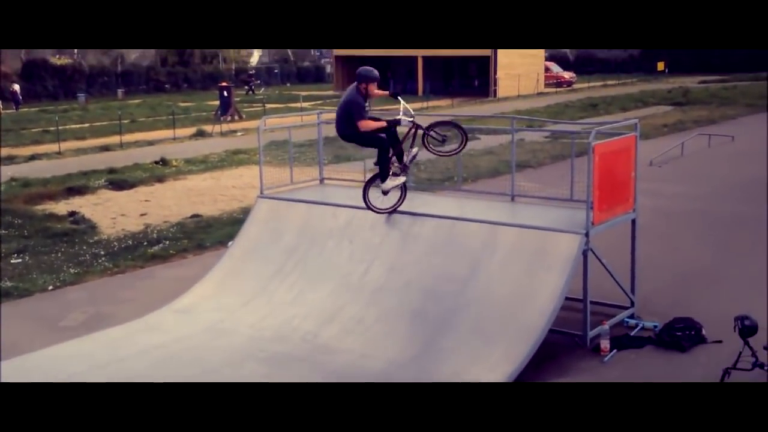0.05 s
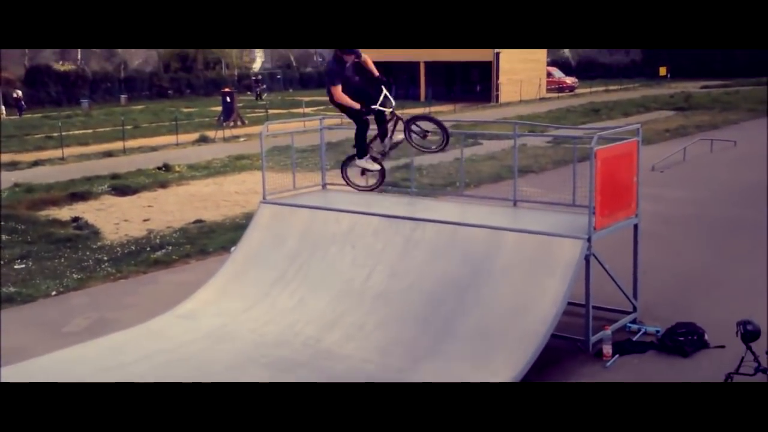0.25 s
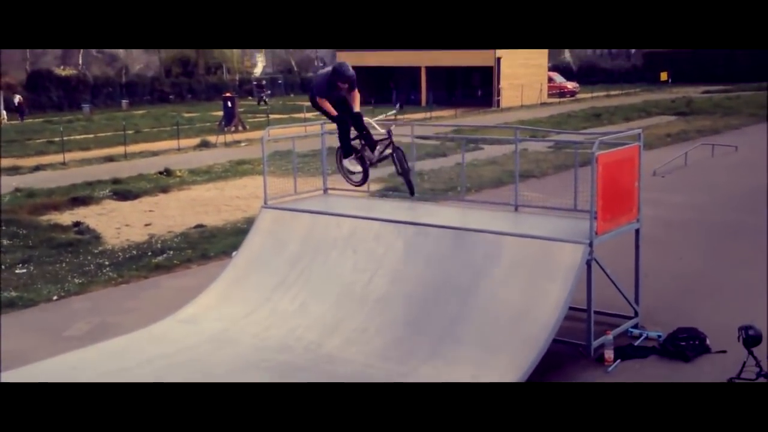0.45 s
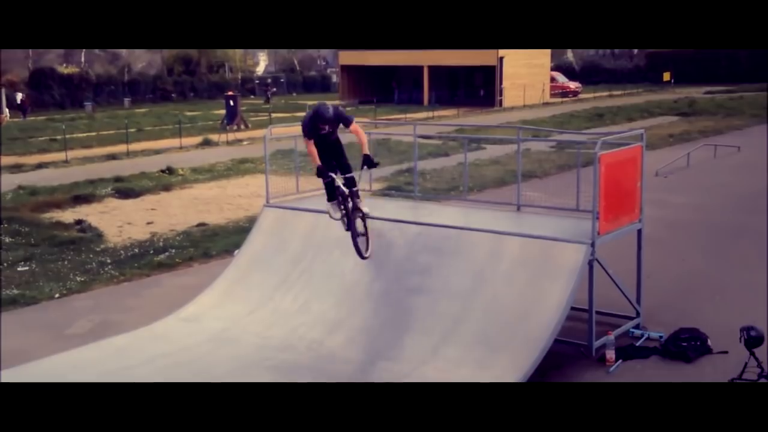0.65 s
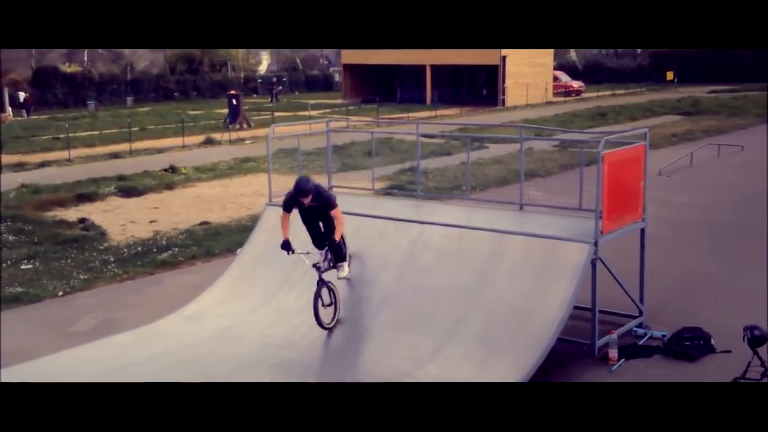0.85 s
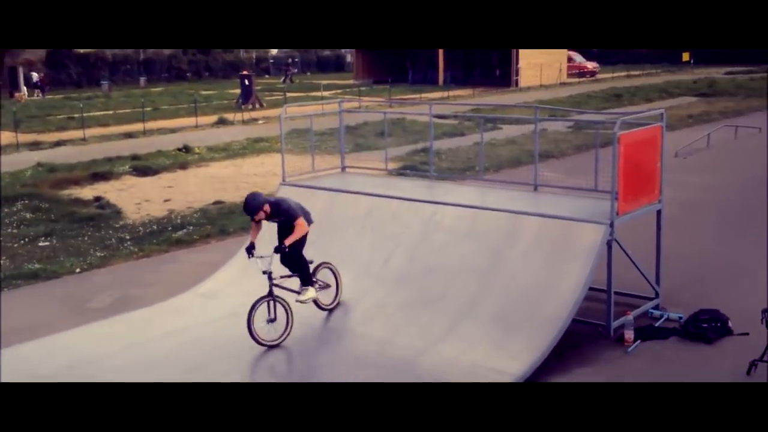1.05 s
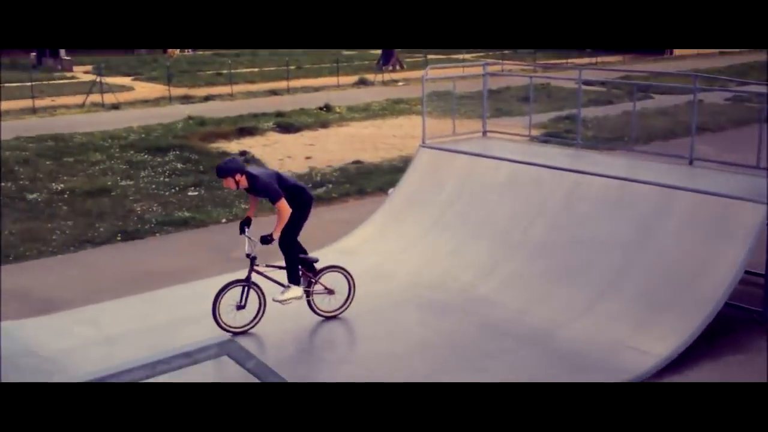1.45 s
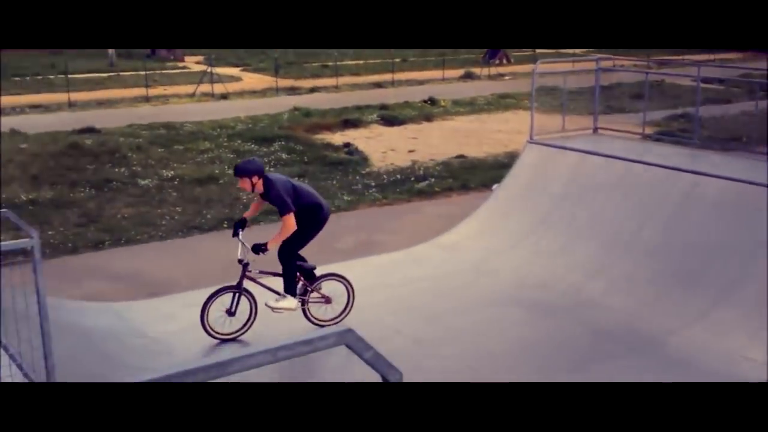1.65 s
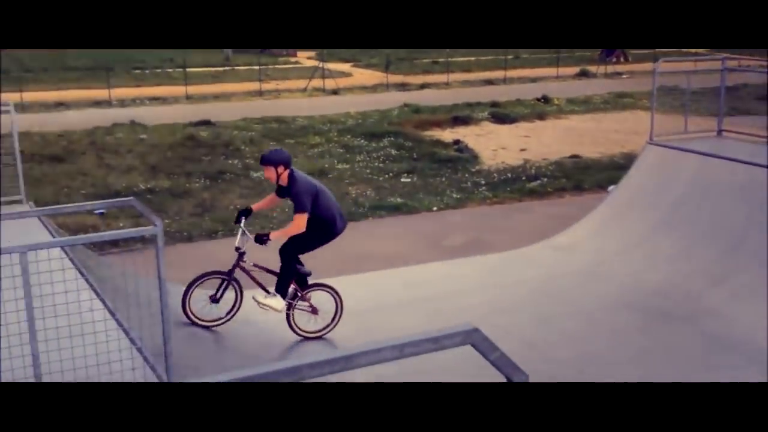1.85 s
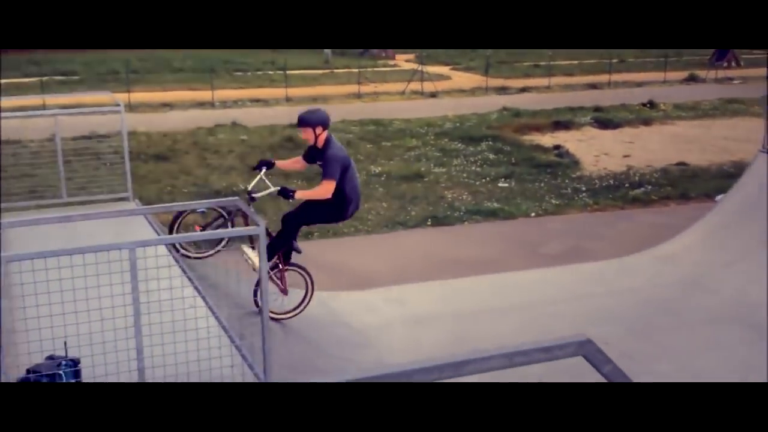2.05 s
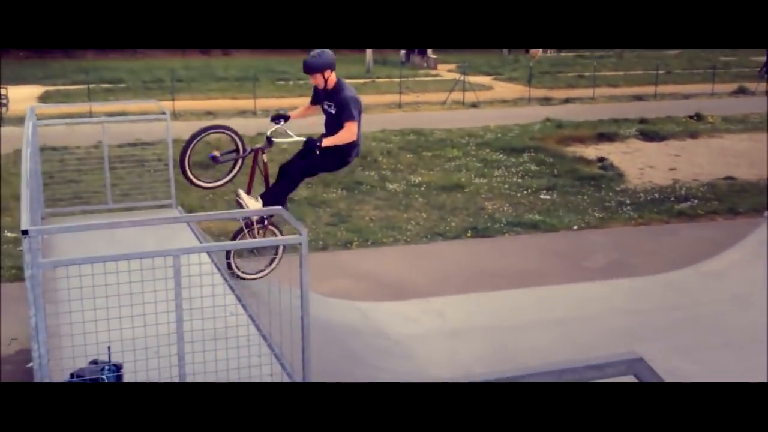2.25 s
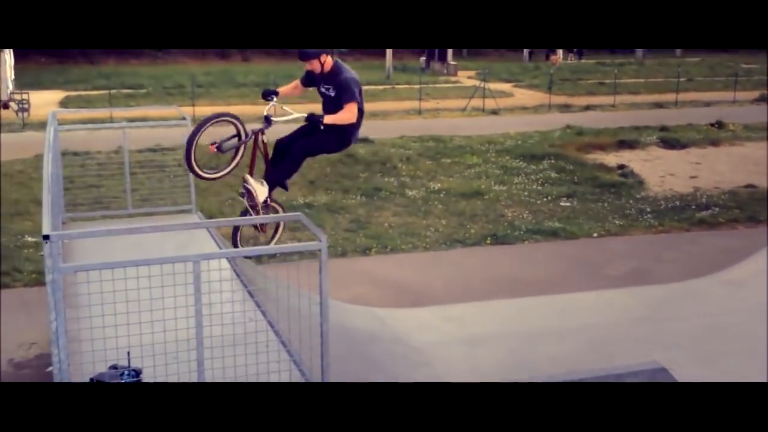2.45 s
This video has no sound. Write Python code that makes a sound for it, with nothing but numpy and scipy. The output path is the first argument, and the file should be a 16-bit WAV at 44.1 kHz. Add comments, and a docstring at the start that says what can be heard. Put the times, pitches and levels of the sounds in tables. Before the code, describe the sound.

A BMX bike thumps on a hollow ramp, then coasts with its freewheel ticking.

```python
"""A hollow quarter pipe booms as a BMX bike hops on its deck, drops in and coasts across a skatepark.
The wheels load the panels and set them ringing, the frame clatters and a tyre squeaks as it twists.
The freewheel pawl ticks with the wheel's speed over grainy tyre hiss and a rising hum, and a wheel
thumps over the ramp's foot. Behind it all: a bed of open air and a few far birds."""
import sys
import numpy as np
from scipy import signal
from scipy.fft import rfft, irfft
from scipy.io import wavfile

SR = 44100
rng = np.random.default_rng(int(sys.argv[2]) if len(sys.argv) > 2 else 0)


def bounce(signal):
    """Save signal as a 16-bit WAV file at the path given by the first command-line argument."""
    frames = np.transpose(np.atleast_2d(signal))
    limited = np.clip(frames, -1, 1)
    pcm = np.round(limited * 32767).astype(np.int16)
    wavfile.write(sys.argv[1], SR, pcm)


N = 110250

# wheels loading the ramp: t/s, level/dB, contact/s
WHEEL_BLOWS = [(.052, -41, .007), (.155, -39, .012), (.235, -17.5, .008), (.254, -19, .006),
               (.287, -19, .009), (.384, -20.5, .008), (.453, -22, .008), (.517, -22.5, .009),
               (.599, -30, .008), (.75, -29, .012), (.886, -36.5, .007), (1.02, -28.5, .016),
               (1.583, -32, .009), (2.035, -42, .012)]
# modes of the hollow ramp's panels: f/Hz, level/dB, t60/s
PANEL_MODES = [(67, 5, .3), (104, 1.5, .22), (122, -1.5, .17), (164, -6, .2), (208, -4, .14),
               (240, -3, .15), (335, -4.5, .11), (405, -14, .14)]
# ramp rumble under the rolling tyres: t/s, level/dB
RUMBLE_FADER = [(0, -41), (.1, -49), (.21, -48.5), (.26, -43), (.42, -31.5), (.56, -34), (.68, -38.5),
                (.95, -45.5), (1.06, -43.5), (1.3, -40), (1.52, -42.5), (1.6, -38), (1.72, -49.5),
                (2.1, -44.5), (2.25, -60), (2.5, -50)]
# wheels crossing the lip at the ramp's foot: t/s, level/dB
LIP_HITS = [(1.197, -44), (1.3627, -25), (1.576, -48.5)]
# modes of the foot plate: f/Hz, level/dB, t60/s
PLATE_MODES = [(253, 3.5, 0.1), (318, -11.5, 0.068), (373, -5.5, 0.087), (429, -6, 0.088)]

# knocks of frame, chain and rims: t/s, level/dB, attack/s, decay/s, tilt/(dB per octave), high cut/Hz
FRAME_KNOCKS = [(.050, -49.5, 0.01, 0.02, 1.5, 10000), (0.065, -40, 0.0028, .013, 1.5, 10000),
                (0.08, -48.5, 0.012, 0.075, 1, 6500), (0.189, -42.5, 0.0041, 0.0054, 1, 8000),
                (0.228, -54, 0.0015, .012, 4, 8000), (.235, -28, 0.0024, 0.0071, -0.17, 5500),
                (0.251, -41, .003, 0.015, 1, 9000), (0.26, -28, 0.0023, 0.015, -2, 10000),
                (.108, -51, 0.003, 0.011, 1.5, 5460), (0.308, -40, 0.0037, 0.014, 0, 9000),
                (0.3507, -28, 0.0026, 0.011, -1, 9000), (.368, -30.5, 0.0021, 0.033, -4.5, 6000),
                (.662, -50, 0.0028, .03, 3, 11000), (0.86, -52, 0.0065, 0.047, 0.5, 10000),
                (1.356, -32.5, 0.0023, 0.0068, 6.5, 2300), (1.992, -50, 0.0066, 0.013, .5, 9000),
                (2.332, -55, 0.0041, 0.036, 13, 2500)]
# noise colour of the knocks: f/Hz, level/dB
KNOCK_EQ = [(150, 18.5), (330, 5.5), (540, -2.5), (780, 3), (1400, -5), (2100, -4.5), (2550, -7.5),
            (3200, -7.5), (4000, -8.5), (5600, -16.5), (8500, -15.5)]
# modes of rims and spokes: f/Hz, level/dB, t60/s
RIM_MODES = [(780, -6, 0.21), (1725, 1, .1), (2786, 2, 0.092), (3090, 7, 0.14), (3240, 9.5, 0.078),
             (3220, -9, 0.11), (3480, -20, 0.14)]

# speed of the freewheel's ticking: t/s, rate/Hz
TICK_RATE = [(0.373, 61.7), (0.428, 57.8), (0.474, 102.2), (0.548, 94.9), (0.605, 68.9), (0.744, 66.4),
             (0.832, 49.0), (0.89, 87.5), (0.998, 68.6), (1.109, 92.0), (1.25, 97.1), (1.286, 82.3),
             (1.357, 104.0), (1.523, 96.3), (1.598, 84.5), (1.651, 40.8), (1.761, 17.8), (1.9, 0.5)]
# tick strength as the bike nears and turns away: t/s, level/dB
TICK_FADER = [(.39, -57), (.44, -58), (.62, -59.5), (.82, -54.5), (1.0, -59), (1.15, -54.5), (1.34, -52),
              (1.46, -58.5), (1.61, -58), (1.67, -63.5), (1.74, -58.5), (1.9, -63)]
# noise colour of the ticks: f/Hz, level/dB
TICK_EQ = [(1500, -18), (3300, -3.5), (4300, -3), (5400, -7), (6800, -2.5), (8600, 0), (10000, 3)]
# modes of the hub: f/Hz, level/dB, t60/s
HUB_MODES = [(4080, -12.5, 0.068), (4860, -17.5, 0.13), (6350, -7, 0.016), (7160, -8, 0.043),
             (8640, -8, 0.046)]

# tyre hiss on the riding surface: t/s, level/dB
HISS_FADER = [(0, -54), (.22, -66.5), (.3, -52.5), (.6, -54.5), (.7, -52), (1.0, -56), (1.35, -54.5),
              (1.6, -55.5), (1.75, -60.5), (1.95, -61), (2.02, -58), (2.15, -63), (2.3, -59.5), (2.4, -58),
              (2.5, -58.5)]
# noise colour of the hiss: f/Hz, level/dB
HISS_EQ = [(200, 11), (350, 8.5), (520, -2), (850, 3), (1400, -2), (2100, 1.5), (3300, -9), (4300, -12.5),
           (5600, -17.5), (8500, -16.5)]
# rubber twisting on the deck: t/s, length/s, first f/Hz, last f/Hz, level/dB, peak/fraction of length
RUBBER_SQUEAKS = [(0.305, .064, 3480, 4650, -50, 0.65), (0.377, 0.026, 5300, 3660, -43.5, 0.1)]
# low hum, rising as the bike gathers speed: t/s, f/Hz, level/dB
HUM_GLIDE = [(0.419, 160, -58), (0.499, 171.8, -45), (0.581, 186, -34), (0.632, 211.2, -46.5),
             (.72, 215.5, -59), (1.122, 225, -75), (1.21, 235.7, -44), (1.331, 252.3, -57),
             (1.441, 271.7, -45.5), (1.542, 308.4, -51), (1.702, 331, -70.5)]

# reflections from ground and ramps: delay/s, level/dB
SLAPBACKS = [(0.0155, -12.5), (0.0267, -19.5)]
# far bird whistles: t/s, first f/Hz, last f/Hz, level/dB, attack/s, decay/s
BIRD_CALLS = [(2.112, 4560, 4100, -59, .04, .055), (2.222, 7800, 6650, -72, .025, .014),
              (2.385, 3250, 2980, -66, .025, .022)]
# noise colour of distant town and light air: f/Hz, level/dB
AIR_EQ = [(24, -35.5), (38, 11), (54, 9.5), (75, 4), (110, -11), (160, -3.5), (260, -24), (450, -17.5),
          (750, -18.5), (1300, -16.5), (2000, -22.5), (3000, -35.5), (4200, -57), (5700, -40.5),
          (8500, -62)]

HIGH_CUT_HZ = 9000


def ramp(dull_hz=260, low_cut_hz=40):
    """The hollow panels boom under each wheel blow and rumble while the tyres roll."""
    blows = sum(from_db(db) * tyre_push(start, contact) for start, db, contact in WHEEL_BLOWS)
    rumble = from_db(curve(RUMBLE_FADER)) * rms_one(ring(slow_noise(dull_hz), PANEL_MODES))
    low_cut = signal.butter(2, low_cut_hz, "high", fs=SR, output="sos")
    return signal.sosfilt(low_cut, ring(blows, PANEL_MODES) + rumble)


def foot_plate(contact_s=.0029):
    """Wheels strike the plate where the ramp meets the ground: short, hollow thumps."""
    force = sum(from_db(db) * tyre_push(start, contact_s) for start, db in LIP_HITS)
    return ring(force, PLATE_MODES)


def frame_clatter(rims_db=-22):
    """Each jolt rattles the bike's many damped parts; the rims ring on under the rattle."""
    knocks = 0
    for start, db, attack, decay, tilt, top_hz in FRAME_KNOCKS:
        high_cut = signal.butter(4, top_hz, fs=SR, output="sos")
        rattle = signal.sosfilt(high_cut, noise(KNOCK_EQ, tilt))
        knocks = knocks + from_db(db) * burst(seconds() - start, attack, decay) * rattle
    rims = np.std(knocks) * rms_one(ring(knocks, RIM_MODES))
    return knocks + from_db(rims_db) * rims


def freewheel(spread_db=2.0, lead_s=.0011):
    """The pawl snaps over each ratchet tooth with a bright tick, and the hub rings faintly."""
    t = seconds()
    coasting = (t > TICK_RATE[0][0]) * (t < TICK_RATE[-1][0])
    teeth_passed = np.cumsum(curve(TICK_RATE) * coasting) / SR
    tick_times = t[1:][np.diff(np.floor(teeth_passed)) > 0] - lead_s
    onsets = (tick_times * SR).astype(int)
    sizzle = noise(TICK_EQ)
    strength = from_db(curve(TICK_FADER) + spread_db * rng.standard_normal(N))
    snaps = np.zeros(N)
    snaps[onsets] = strength[onsets]
    tick_shape = burst(t[:SR // 20], attack_s=.0012, decay_s=.0022, hold_s=.0008)
    return sizzle * signal.fftconvolve(snaps, tick_shape)[:N] + ring(snaps, HUB_MODES)


def tyre_hiss(grain_db=.9, grain_hz=70):
    """Rubber rolls over the riding surface: a hiss with a fine grain in its level."""
    grain = grain_db * slow_noise(grain_hz)
    return from_db(curve(HISS_FADER) + grain) * noise(HISS_EQ)


def tyre_squeaks():
    """Rubber twists on the deck in short, gliding squeaks."""
    out = 0
    for start, length, first_hz, last_hz, db, peak in RUBBER_SQUEAKS:
        progress = (seconds() - start) / length
        swell = np.interp(progress, [0, peak, 1], [0, 1, 0])
        pitch = np.interp(progress, [0, 1], [first_hz, last_hz])
        out = out + from_db(db) * swell * rough_tone(pitch, width_hz=400)
    return out


def rolling_hum():
    """A rough, low, climbing tone, like tread singing on the riding surface."""
    times, hz, db = np.transpose(HUM_GLIDE)
    t = seconds()
    gate = (t > times[0]) * (t < times[-1])
    return gate * from_db(np.interp(t, times, db)) * rough_tone(np.interp(t, times, hz), width_hz=14)


def slapback(dry, dull_hz=5200):
    """The direct sound plus its dull reflections off ground and ramps."""
    t, dull = seconds(), lowpass(dry, dull_hz)
    return dry + sum(from_db(db) * np.interp(t - delay, t, dull, left=0) for delay, db in SLAPBACKS)


def birds(glide_s=.034):
    """Far whistles that fall in pitch and level out."""
    out = 0
    for start, first_hz, last_hz, db, attack, decay in BIRD_CALLS:
        age = np.maximum(seconds() - start, 0)
        pitch = last_hz + (first_hz - last_hz) * np.exp(-age / glide_s)
        out = out + from_db(db) * burst(age, attack, decay) * rough_tone(pitch, width_hz=13.4)
    return out


def open_air(level_db=-48):
    """A steady, bass-heavy bed of distant town and light air."""
    return from_db(level_db) * noise(AIR_EQ)


def tyre_push(start_s, contact_s):
    """A tyre's soft force pulse, of unit area: quick squeeze, slower release."""
    progress = np.maximum(seconds() - start_s, 0) / contact_s
    force = progress * np.exp(-2 * np.pi * progress)
    return force / force.sum()


def ring(force, modes):
    """A body's modes ring in answer to a force, neighbours in opposite polarity."""
    out = 0
    for k, (hz, db, t60) in enumerate(modes):
        radius, angle = np.exp(-np.log(1000) / (t60 * SR)), 2 * np.pi * hz / SR
        poles = [1, -2 * radius * np.cos(angle), radius ** 2]
        out = out + (-1) ** k * from_db(db) * signal.lfilter([0, np.sin(angle)], poles, force + 1e-18)
    return out


def rough_tone(hz, width_hz):
    """A narrow band of noise that follows a pitch curve."""
    phase = 2 * np.pi * np.cumsum(hz) / SR
    return (slow_noise(width_hz) * np.cos(phase) + slow_noise(width_hz) * np.sin(phase)) / np.sqrt(2)


def noise(eq, tilt_db=0):
    """Unit-power noise shaped by an EQ curve and a tilt per octave."""
    bin_hz = np.maximum(np.arange(N // 2 + 1) * SR / N, 1)
    hz, db = np.transpose(eq)
    octave = np.log2(np.clip(bin_hz, hz[0], hz[-1]))
    gain = from_db(np.interp(octave, np.log2(hz), db) + tilt_db * octave)
    band_edges = np.minimum(bin_hz / hz[0], 1) ** 2 * (bin_hz < HIGH_CUT_HZ)
    return rms_one(irfft(rfft(rng.standard_normal(N)) * gain * band_edges, N))


def slow_noise(hz):
    """A random wobble of unit power, rolled off above hz."""
    return rms_one(lowpass(lowpass(rng.standard_normal(N), hz), hz))


def burst(t, attack_s, decay_s, hold_s=0):
    """An envelope: smooth attack to 1, hold, exponential tail."""
    attack = np.sin(np.pi / 2 * np.clip(t / attack_s, 0, 1)) ** 2
    return attack * np.exp(-np.maximum(t - attack_s - hold_s, 0) / decay_s)


def lowpass(x, hz):
    """A gentle one-pole high cut."""
    return signal.sosfilt(signal.butter(1, hz, fs=SR, output="sos"), x)


def curve(rows):
    """An automation line through (time, value) points."""
    return np.interp(seconds(), *np.transpose(rows))


def seconds():
    """The time of every sample."""
    return np.arange(N) / SR


def from_db(db):
    """Decibels to gain."""
    return 10 ** (np.asarray(db) / 20)


def rms_one(x):
    """Scale to unit power."""
    return x / np.sqrt(np.mean(x ** 2) + 1e-20)


def scene():
    """The mono mix: booming ramp, bike and foot plate with slapback, hum, birds and air."""
    bed = open_air()
    ride = freewheel() + frame_clatter() + tyre_hiss() + tyre_squeaks() + foot_plate()
    return (ramp() + slapback(ride) + rolling_hum() + birds() + bed)[None]


def record(dry):
    """A steep high cut on the whole mix."""
    return signal.sosfilt(signal.ellip(10, .2, 70, HIGH_CUT_HZ, fs=SR, output="sos"), dry)


dry = scene()
out = record(dry)
bounce(out)
```